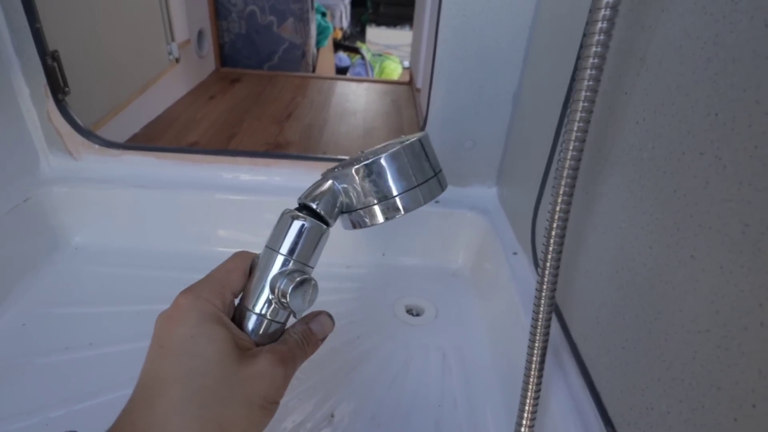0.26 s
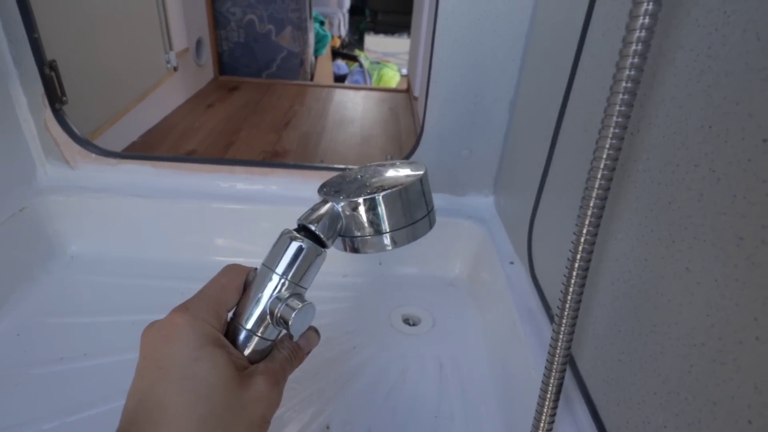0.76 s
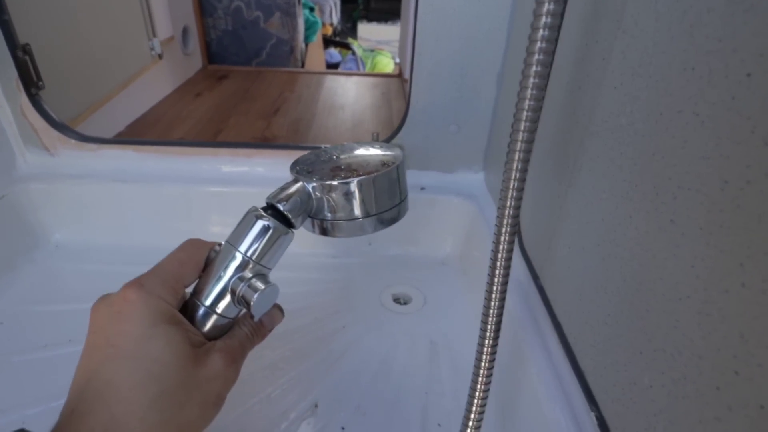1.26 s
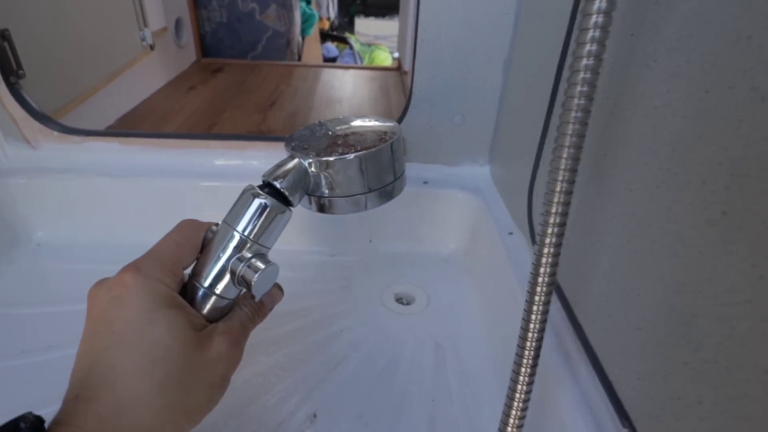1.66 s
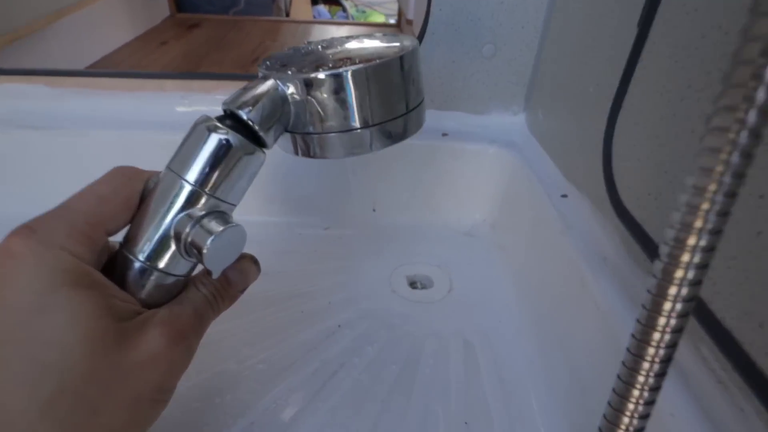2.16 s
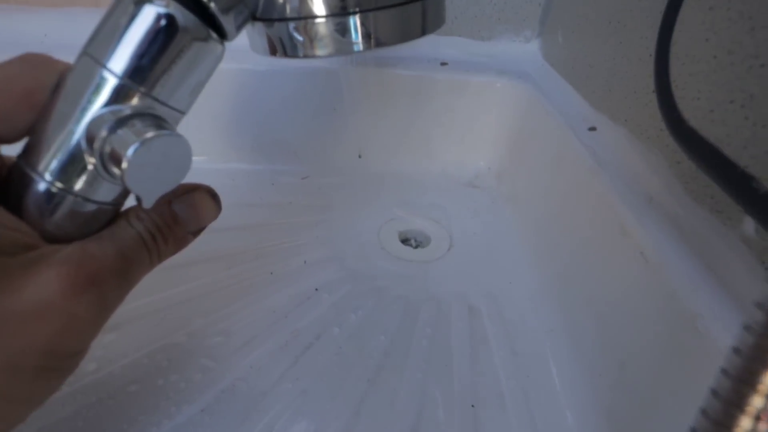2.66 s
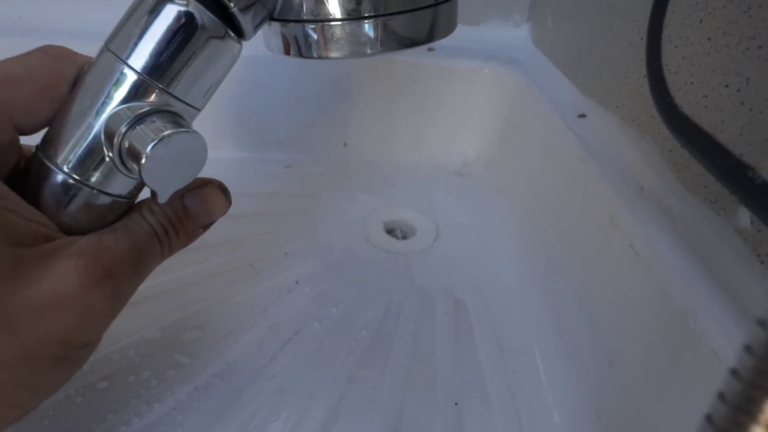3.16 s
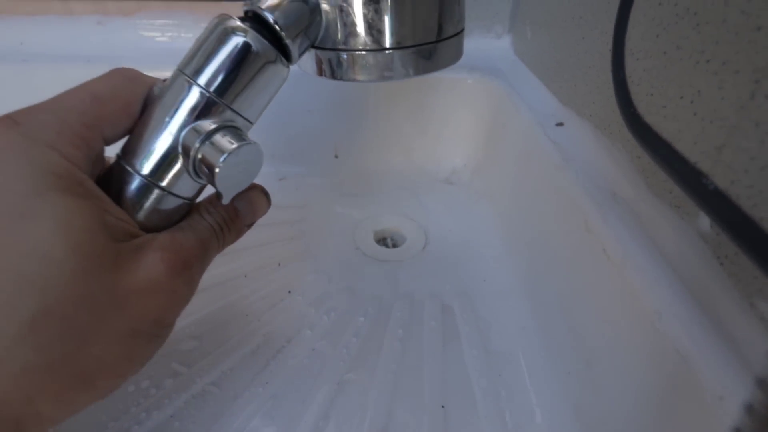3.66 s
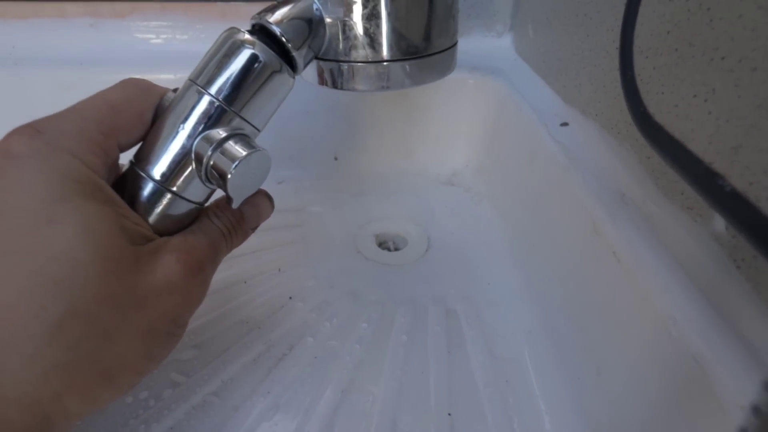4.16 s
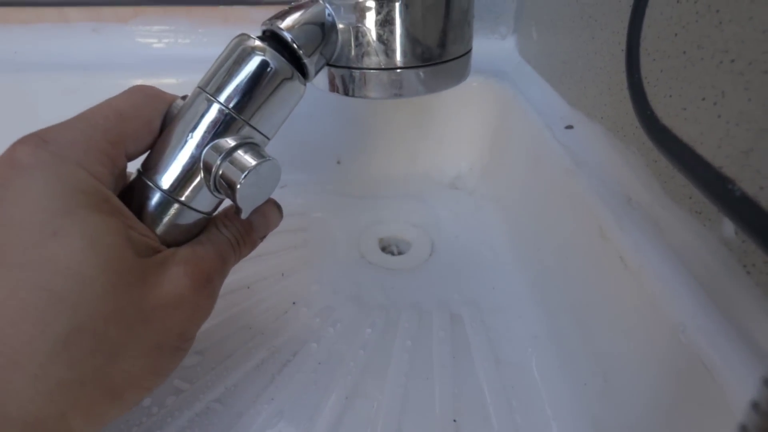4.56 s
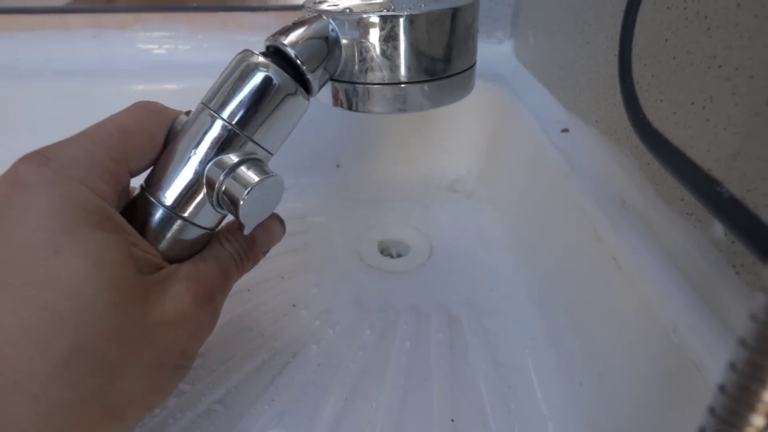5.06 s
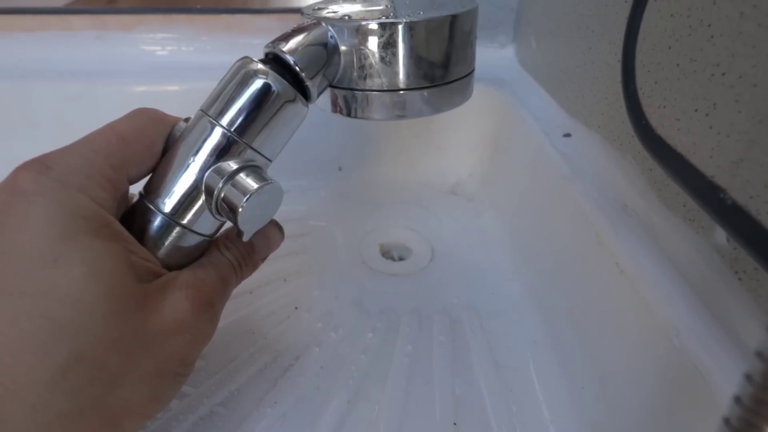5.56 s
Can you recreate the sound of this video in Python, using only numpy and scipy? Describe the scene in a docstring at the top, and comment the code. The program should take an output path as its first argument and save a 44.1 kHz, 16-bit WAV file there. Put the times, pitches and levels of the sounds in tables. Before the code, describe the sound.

A close, centred mono perspective inside a cramped plastic-walled camper washroom. It starts quietly with a low van rumble and a rough, mid-low water pump drone. A small valve click comes almost at once. From about 0.3 to 0.6 s the shower head spits out air: sharp little pops, a very high, brief rising squeal, crackling fizz and short spurts. A bubbly gurgle peaks near 1 s as the head fills. The spray then becomes a fine, bright hiss, growing steadily and turning keener against the tray wall until about 3.4 s, with a small splash near 2.2 s. It eases briefly, then patters on the plastic floor from 3.7 s, sputtering. From 4.2 s splatter and hard wet slaps arrive irregularly. From 4.85 s to the end near 5.8 s, water drums loudly on a hollow panel, burbling around a resonant middle pitch, with surges and crackling drops.

```python
"""A water pump drones over a van's low rumble, then a valve clicks: a hand shower opens in a tiny washroom.
The head pops, squeals and gurgles out its air as noise bursts, a rising tone and ringing bubbles.
Thousands of random drops build to a hiss and come closer; resonances make them sweep over a plastic tray's
wall, patter on its floor, splatter along the rim and at last drum on a hollow panel.
One microphone close by, among close plastic walls; both channels are the same."""
import sys
import numpy as np
from scipy import signal
from scipy.fft import rfft, irfft, next_fast_len
from scipy.io import wavfile

SR = 44100
rng = np.random.default_rng(int(sys.argv[2]) if len(sys.argv) > 2 else 0)


def file_out(sig):
    """Save sig as 16-bit WAV at sys.argv[1]."""
    # one column per channel
    cols = np.atleast_2d(sig).T
    # limit, then scale
    lim = np.clip(cols, -1, 1)
    pcm = np.round(lim * 32767).astype(np.int16)
    wavfile.write(sys.argv[1], SR, pcm)


N = 255582
TIME = np.arange(N) / SR  # s
SIZE = next_fast_len(N)  # transform length
FREQ = np.maximum(np.fft.rfftfreq(SIZE, 1 / SR), 1)  # Hz

# Spectral colours of the van, jets, aerated fizz and water film: pitch_hz, relative_level_db
VAN_COLOUR = [(15, -27), (27, -8.5), (40, -4), (55, -12), (90, -9), (180, -8), (290, -14), (375, -12),
              (470, -15), (620, -11.5), (790, -15.5), (1200, -17.5), (15000, -37)]
JET_COLOUR = [(300, -46), (1100, -37), (2400, -13), (3100, -6), (3700, -4.5), (4500, -4), (5500, -0.5),
              (6900, -0.5), (8500, 2), (10600, -4), (12300, 0), (13600, -2.5), (14400, -4), (15500, -16)]
FIZZ_COLOUR = [(400, -35), (900, -5.5), (1400, 5), (2000, 6.5), (2400, 4.5), (2900, 4), (4400, 1.5),
               (6500, -9.5), (15000, -16)]
FILM_COLOUR = [(1000, -12.5), (3000, -44), (4400, -4.5), (5000, -2), (5600, -4), (6250, 6.5), (7000, -5),
               (7600, -9), (9000, -20), (10000, -21), (12200, -6), (15000, -28)]
# Resonances of the pump, shower head, and the tray's wall, floor and rim, then the hollow panel's
# lower and upper modes: pitch_hz, width_hz, relative_level_db
PUMP_MODES = [(549, 14.5, 0.048), (603, 28, 0.46)]
HEAD_MODES = [(1040, 140, 1.7), (1310, 150, 0.5)]
WALL_MODES = [(784, 52, -5.5), (1470, 120, -21), (2100, 120, -17), (2530, 82, -2.5), (3140, 155, 3.5),
              (3870, 530, 1), (5390, 720, 3.5), (8220, 590, 2.5), (9900, 1000, -4)]
FLOOR_MODES = [(379, 19, -0.5), (605, 26, -0.5), (744, 80, -2), (820, 57, 1), (1016, 18, 1.5),
               (1407, 95, -2.5), (1780, 90, -1.5), (1892, 46, 3), (2200, 38, 1), (2670, 180, -6.5),
               (3570, 140, 1.5), (4170, 37, -5)]
RIM_MODES = [(1317, 69, 1.5), (1425, 180, -3), (1700, 37, 2.5), (2060, 90, 2), (2630, 170, 2),
             (3100, 730, -2.5), (3630, 130, 6), (3930, 140, 0), (4520, 100, -2.5), (5120, 100, 2),
             (6370, 330, -18), (8500, 540, -10)]
PANEL_MODES = [(757, 59, -4.5), (838, 72, -2), (927.6, 20.5, 0), (1018, 42, 2.5), (1140, 78, 2),
               (1251, 23, -0.5), (1340, 20, -1), (1460, 69, -6.5)]
PANEL_OVERTONES = [(1815, 180, 2.5), (2246, 39, 4), (2550, 160, -2.5), (2880, 68, -0.5), (3600, 126, 5.5),
                   (3900, 95, 3), (4730, 90, -1.5), (5120, 120, -0.5), (6250, 310, -0.5), (6930, 200, 0.5)]

# The valve's click and air pockets popping in the nozzles, before a 1 dB cut:
# start_s, level_db, pitch_hz, half_width_hz, decay_s
AIR_POPS = [(0.0224, -36.5, 6800, 4500, 0.0026), (0.327, -38, 13000, 1000, 0.006),
            (0.339, -27.5, 3720, 198, 0.004), (0.359, -40, 11500, 3500, 0.012),
            (0.403, -32, 7500, 6000, 0.0031), (0.443, -34, 6860, 1300, 0.0045),
            (0.497, -41, 2000, 300, 0.02), (0.544, -36.5, 2230, 400, 0.025), (0.595, -39, 2190, 250, 0.015),
            (0.6061, -20.5, 4560, 690, 0.0032)]
# Gouts of water slapping the tray: start_s, level_db, pitch_hz, half_width_hz, decay_s
WATER_SLAPS = [(2.218, -30, 13200, 1200, 0.009), (2.243, -26.5, 12900, 1500, 0.0055),
               (2.288, -31, 5670, 2500, 0.012), (2.296, -24.5, 10000, 6000, 0.014),
               (3.8104, -26, 7140, 1300, 0.013), (3.94, -19, 6200, 800, 0.013),
               (4.0104, -25, 12070, 2200, 0.02), (4.195, -19.5, 2650, 1390, 0.008),
               (4.2224, -13.5, 8400, 1400, 0.0026), (4.23, -17.5, 5200, 1200, 0.0054),
               (4.262, -20, 2100, 600, 0.0036), (4.398, -19, 3860, 1500, 0.0093),
               (4.4375, -21, 3940, 1200, 0.005), (4.548, -28, 13700, 1200, 0.016),
               (4.622, -24, 4040, 500, 0.0091), (4.775, -20, 7300, 3000, 0.014),
               (4.845, -21.5, 1420, 600, 0.0055), (4.9708, -18, 3660, 493, 0.0066),
               (4.978, -10, 6700, 1500, 0.0029), (5.019, -15, 6980, 2000, 0.0045),
               (5.075, -18, 1210, 500, 0.014), (5.163, -14.5, 6630, 2000, 0.003),
               (5.253, -11.5, 960, 290, 0.004), (5.3266, -13, 6340, 2000, 0.0024),
               (5.605, -17, 6660, 2490, 0.0062)]
# Strength of the spray as pressure builds and the head comes closer, before the hiss's gain: time_s, level_db
FLOW = [(0.2, -66), (0.32, -53), (0.85, -46), (1.3, -39), (2.1, -36.5), (2.7, -35.5), (3.25, -31.5),
        (3.7, -34), (4.25, -29), (5.05, -31.5), (5.35, -33.5), (5.8, -33.5)]
# Spurts as pockets of air leave the hose, before the hiss's gain: start_s, end_s, level_db
SPURTS = [(0.31, 0.37, -46), (0.51, 0.56, -49), (0.635, 0.76, -45.5), (2.21, 2.31, -38)]
# The jets dwell on the tray's floor: start_s, end_s, level_db
FLOOR_PASSES = [(3.1, 3.4, -49.5), (3.69, 4.01, -34), (4.12, 4.45, -40), (4.47, 4.68, -32)]
# The jets cross the rim, before a 1.5 dB cut: start_s, end_s, level_db
RIM_PASSES = [(4.175, 4.42, -26.5), (4.47, 4.52, -25.5), (4.73, 4.87, -33.5), (5.06, 5.11, -30.5),
              (5.405, 5.49, -31.5), (5.58, 5.8, -35.5)]
# Surges as the jets bear squarely on the panel: start_s, end_s, level_db
PANEL_SURGES = [(4.89, 5.1, -25), (5.23, 5.28, -23.5), (5.395, 5.57, -23.5), (5.63, 5.8, -23.5)]
# Centre of the pitch favoured by the spot the jets hit on the panel: time_s, pitch_hz
PANEL_SPOT = [(4.85, 1130), (4.95, 1070), (5.1, 1070), (5.27, 1000), (5.45, 1070), (5.55, 914), (5.72, 970),
              (5.78, 1220)]

# The fizz sets in with the first water; its level is for a flow of 0 dB, and it follows a share of the flow's dB
FIZZ_START_S, FIZZ_END_S, FIZZ_DB, FIZZ_FOLLOWS = 0.262, 5, -36.5, 0.2
# The gurgle peaks just as the head fills up, over a steadier bubbling
FULL_S, GURGLE_DB, GURGLE_RISE_S, GURGLE_FALL_S, GURGLE_REST_DB = 1.03, -49.5, 0.18, 0.2, -55.5
# The jets graze the wall ever more closely up to this level, then slip off it
WALL_START_S, WALL_END_S, WALL_DB, WALL_RISE_DB_PER_S = 1.13, 3.416, -28, 9
# The hiss sputters once the jets have left the wall and churn the water in the tray
SPUTTER_START_S, SPUTTER_DB, SPUTTER_HZ = 3.66, 1, 22.6
STRAY_DB = -10  # stray drops on the floor, relative to the flow
FILM_FLOOR_DB, FILM_PANEL_DB = -0.5, -11  # film crackle, relative to the floor and panel gains
PANEL_START_S, PANEL_DB = 4.85, -25.5  # from here on the jets stay on the hollow panel
BURBLE_OCTAVES = 0.14  # spread of the favoured pitch as lumps land here and there
TOP_HZ = 15600  # top of the recorder's treble


def amp(db):
    """Decibels to gain."""
    return 10 ** (np.asarray(db) / 20)


def unit(x):
    """Scale to rms 1."""
    return x / np.sqrt(np.mean(x ** 2))


def fader(curve):
    """Gain along a (time_s, level_db) curve, dying away quickly outside it."""
    s, level_db = np.transpose(curve)
    outside_s = np.maximum(s[0] - TIME, 0) + np.maximum(TIME - s[-1], 0)
    return amp(np.interp(TIME, s, level_db)) * np.exp(-outside_s / .05)


def dwell(start_s, end_s, attack_s, release_s):
    """Gain that rises, holds and dies away."""
    rise = 1 - np.exp(-np.maximum(TIME - start_s, 0) / attack_s)
    return rise * np.exp(-np.maximum(TIME - end_s, 0) / release_s)


def passes(table, attack_s, release_s):
    """Gain of a series of (start_s, end_s, level_db) dwells, summed in power."""
    power = sum((amp(db) * dwell(start_s, end_s, attack_s, release_s)) ** 2
                for start_s, end_s, db in table)
    return np.sqrt(power)


def walk(rate):
    """Smooth random wandering with about `rate` turns a second; spread 1."""
    smoothing = 1 + (FREQ / rate) ** 4
    return unit(irfft(rfft(rng.standard_normal(SIZE)) / smoothing, SIZE)[:N])


def colour(x, points):
    """Causal filter with the given (pitch_hz, level_db) shape, so that clicks keep their sharp front."""
    hz, db = np.transpose(points)
    log_gain = np.log(amp(np.interp(np.log(FREQ), np.log(hz), db)))
    cepstrum = irfft(log_gain, SIZE)
    # keeping only the doubled first half makes the filter minimum phase
    response = np.exp(rfft(2 * cepstrum[:SIZE // 2], SIZE))
    return unit(irfft(rfft(x, SIZE) * response, SIZE)[:N])


def ring(x, modes):
    """Drive a set of (pitch_hz, width_hz, level_db) resonances, neighbours in opposite phase."""
    response = sum((-1) ** k * amp(db) / (1 + 1j * (FREQ ** 2 - hz ** 2) / (FREQ * width_hz))
                   for k, (hz, width_hz, db) in enumerate(modes))
    return unit(irfft(rfft(x, SIZE) * response, SIZE)[:N])


def drops(rate, spread_db, swell_db, swell_rate):
    """Impacts at random moments and of random size, their strength swelling and fading as the jets break up."""
    lands = rng.random(N) < rate / SR  # rate in drops per second
    size_db = spread_db * np.minimum(rng.standard_normal(N), 2) + swell_db * walk(swell_rate)
    return lands * amp(size_db) * rng.choice([-1, 1], N)


def bursts(table, rise_s):
    """Short splashes of noise, each dying away around its own pitch."""
    out = np.zeros(2 * N)
    t = TIME[:SR // 10]
    for start_s, db, hz, half_width_hz, decay_s in table:
        edges = np.clip([hz - half_width_hz, hz + half_width_hz], 200, .48 * SR)
        band = signal.butter(2, edges, "bandpass", fs=SR)
        splash = unit(signal.lfilter(*band, rng.standard_normal(len(t))))
        envelope = (1 - np.exp(-t / rise_s)) * np.exp(-t / decay_s)
        start = max(int(start_s * SR), 0)
        out[start:start + len(t)] += amp(db) * splash * envelope
    return out[:N]


def van():
    """Low rumble of the van, slowly swelling, and its pump's rough drone: noise through two resonances."""
    rumble_gain = fader([(0, -50), (2.1, -49.5), (4.5, -47.5), (5.8, -45)])
    pump_gain = fader([(0, -57), (1.9, -54), (2.6, -63.5), (5.8, -49)])
    rumble = colour(rng.standard_normal(N), VAN_COLOUR) * rumble_gain
    pump = ring(rng.standard_normal(N), PUMP_MODES) * pump_gain
    return rumble + pump


def valve_and_air_pops():
    """The valve clicks, then trapped air pops in the nozzles as sharp bursts of noise."""
    return amp(-1) * bursts(AIR_POPS, rise_s=0.00016)


def spray(flow):
    """Thousands of tiny droplets merge into a hiss that flutters, and later sputters."""
    mist = drops(rate=11000, spread_db=2.0, swell_db=0.84, swell_rate=110)
    jets = np.hypot(flow, passes(SPURTS, attack_s=.015, release_s=0.016))
    churning = dwell(SPUTTER_START_S, TIME[-1], attack_s=0.072, release_s=1)
    sputter_db = SPUTTER_DB * walk(SPUTTER_HZ) * churning
    flutter_db = 0.36 * walk(22)
    return colour(mist, JET_COLOUR) * jets * amp(3 + flutter_db + sputter_db)


def fizz(flow):
    """Air driven out through the nozzles breaks into a dense crackle of tiny impacts."""
    wet_air = dwell(FIZZ_START_S, FIZZ_END_S, attack_s=0.012, release_s=0.61)
    aerated = amp(FIZZ_DB) * flow ** FIZZ_FOLLOWS * wet_air
    # one long froth as the air is driven out of the hose
    froth = amp(-46.5) * dwell(0.45, 0.57, attack_s=.02, release_s=.02)
    bubbles = drops(rate=5000, spread_db=2.5, swell_db=1.7, swell_rate=16)
    return colour(bubbles, FIZZ_COLOUR) * np.hypot(aerated, froth)


def gurgle():
    """Bubbles ring the head's resonances, loudest just as it fills up."""
    filling = np.exp(np.minimum((TIME - FULL_S) / GURGLE_RISE_S, (FULL_S - TIME) / GURGLE_FALL_S))
    resting = dwell(FIZZ_START_S, FULL_S, attack_s=0.013, release_s=1.9)
    bubbling = amp(GURGLE_DB) * filling + amp(GURGLE_REST_DB) * resting
    bubbles = drops(rate=1100, spread_db=0.5, swell_db=0.0, swell_rate=50)
    return ring(bubbles, HEAD_MODES) * bubbling


def squeal():
    """A sputtering tone climbs as the last air gap narrows."""
    climb_hz = np.interp(TIME, [.32, .36, .385, .415, .435], [8500, 9340, 11500, 12700, 15200])
    pitch_hz = climb_hz + 700 * walk(880)
    tone = np.sin(2 * np.pi * np.cumsum(pitch_hz) / SR)
    sputter = amp(3.7 * walk(150))
    return tone * sputter * amp(-42.0) * dwell(0.31, .425, attack_s=.008, release_s=.007)


def tray_wall():
    """Jets grazing the wall ring its resonances, a keener hiss that grows until they slip off."""
    closing_db = WALL_DB + WALL_RISE_DB_PER_S * np.minimum(TIME - WALL_END_S, 0)
    grazing = amp(closing_db) * dwell(WALL_START_S, WALL_END_S, attack_s=0.057, release_s=0.25)
    return ring(drops(rate=12000, spread_db=3.0, swell_db=1, swell_rate=31), WALL_MODES) * grazing


def tray_floor(flow, on_floor):
    """Heavier drops ring the plastic floor; strays reach it in step with the flow."""
    stray = flow * amp(STRAY_DB) * dwell(1.5, TIME[-1], attack_s=0.78, release_s=1)
    patter = drops(rate=1800, spread_db=0.0, swell_db=1.0, swell_rate=37)
    return ring(patter, FLOOR_MODES) * np.hypot(on_floor, stray)


def slaps():
    """Gouts of water slap the tray as short bursts of noise."""
    return bursts(WATER_SLAPS, rise_s=0.00049)


def water_film(on_floor, on_panel):
    """Drops of very uneven size crackle in the film of water on floor and panel."""
    splashing = amp(FILM_FLOOR_DB) * on_floor + amp(FILM_PANEL_DB) * on_panel
    return colour(drops(rate=2700, spread_db=8.0, swell_db=1.5, swell_rate=110), FILM_COLOUR) * splashing


def tray_rim():
    """Drops of swelling strength splatter along the rim and ring it each time the jets cross."""
    on_rim = passes(RIM_PASSES, attack_s=0.004, release_s=0.055)
    splatter = drops(rate=3000, spread_db=4.5, swell_db=3.0, swell_rate=190)
    return ring(splatter, RIM_MODES) * on_rim * amp(-1.5)


def panel(on_panel):
    """The merged jets land in lumps on a hollow part of the tray; the spot they hit picks which modes speak."""
    # every lump lands a little elsewhere, which makes the drumming burble
    favoured_hz = np.interp(TIME, *np.transpose(PANEL_SPOT)) * 2 ** (BURBLE_OCTAVES * walk(50))
    lumps = drops(rate=850, spread_db=2.5, swell_db=3, swell_rate=164)
    boom = np.zeros(N)
    for k, (hz, width_hz, db) in enumerate(PANEL_MODES):
        off_spot_db = -30 * np.log2(hz / favoured_hz) ** 2
        boom += (-1) ** k * amp(db) * ring(lumps * amp(off_spot_db), [(hz, width_hz, 0)])
    knock = ring(lumps, PANEL_OVERTONES)
    # the whole tray thuds underneath
    thud = ring(lumps, [(360, 106, 0), (574, 60, 0)])
    return (unit(boom) + amp(-7) * knock + amp(-24) * thud) * on_panel


def washroom(x, t60_s, wet_db):
    """Close plastic walls answer within milliseconds and die away fast."""
    t = TIME[:SR // 4]
    echoes = rng.standard_normal(len(t)) * np.exp(-np.log(1000) * t / t60_s) * (t > .002)
    wet = signal.fftconvolve(x, echoes / np.linalg.norm(echoes))[:N]
    return (x + amp(wet_db) * wet) / np.hypot(1, amp(wet_db))


def scene():
    """All the water in the small room, over the van, the same in both channels."""
    flow = fader(FLOW)
    on_floor = passes(FLOOR_PASSES, attack_s=0.018, release_s=0.086)
    resting = amp(PANEL_DB) * dwell(PANEL_START_S, TIME[-1], attack_s=0.033, release_s=1)
    on_panel = np.hypot(resting, passes(PANEL_SURGES, attack_s=0.01, release_s=0.055))
    head = valve_and_air_pops() + fizz(flow) + gurgle() + squeal()
    tray = tray_wall() + tray_floor(flow, on_floor) + slaps() + water_film(on_floor, on_panel) + tray_rim()
    water = head + spray(flow) + tray + panel(on_panel)
    mono = washroom(water, t60_s=0.13, wet_db=-11.5) + van()
    return np.array([mono, mono])


def record(dry):
    """The recorder cuts the top of the treble with a steep low-pass."""
    return signal.sosfilt(signal.ellip(10, .2, 80, TOP_HZ, fs=SR, output="sos"), dry)


dry = scene()
out = record(dry)
file_out(out)
```